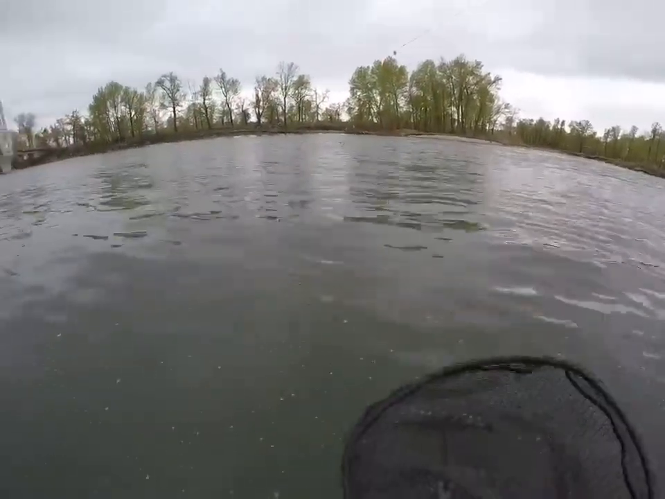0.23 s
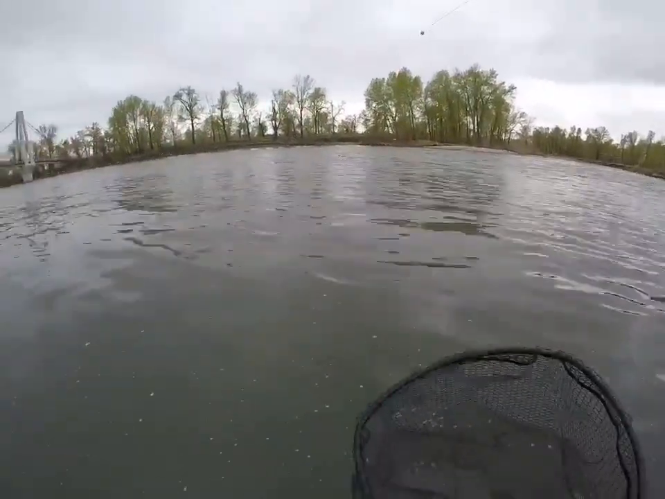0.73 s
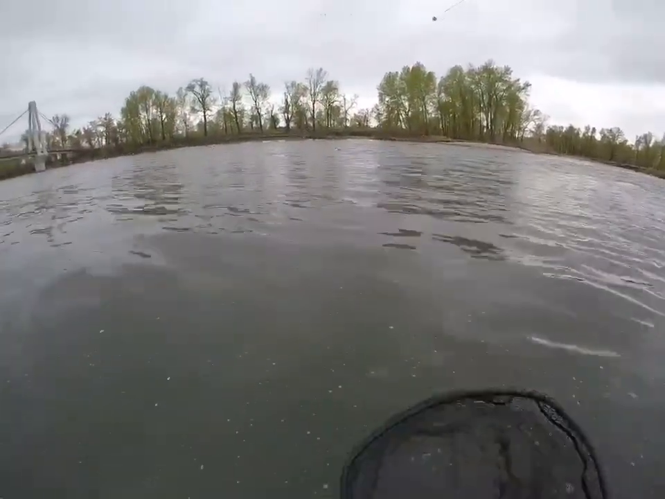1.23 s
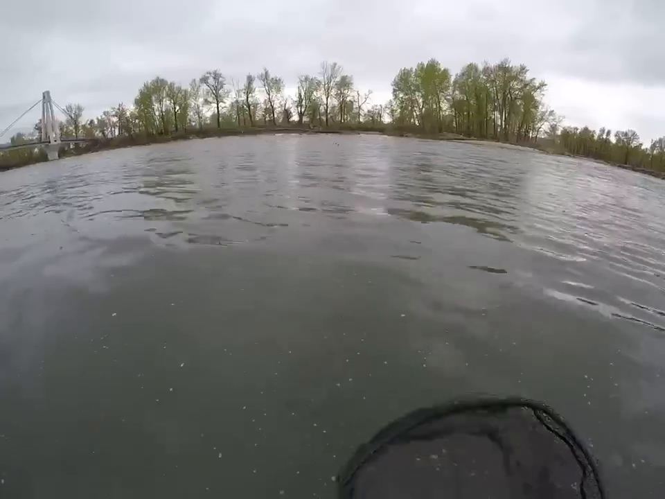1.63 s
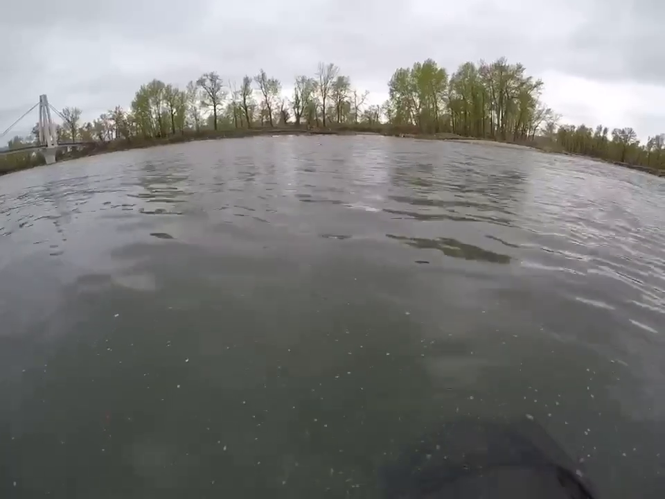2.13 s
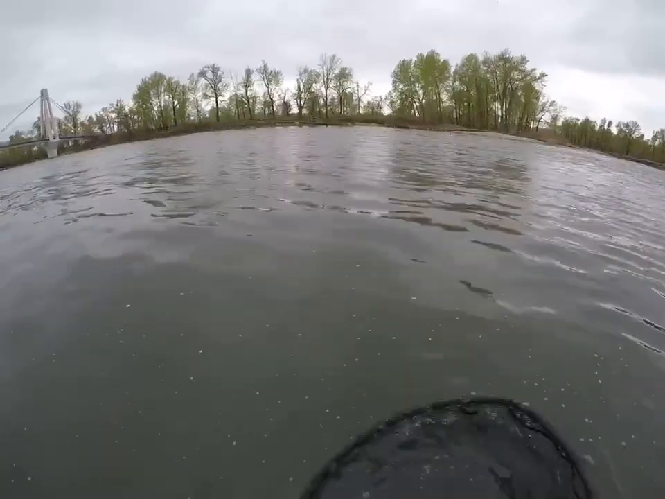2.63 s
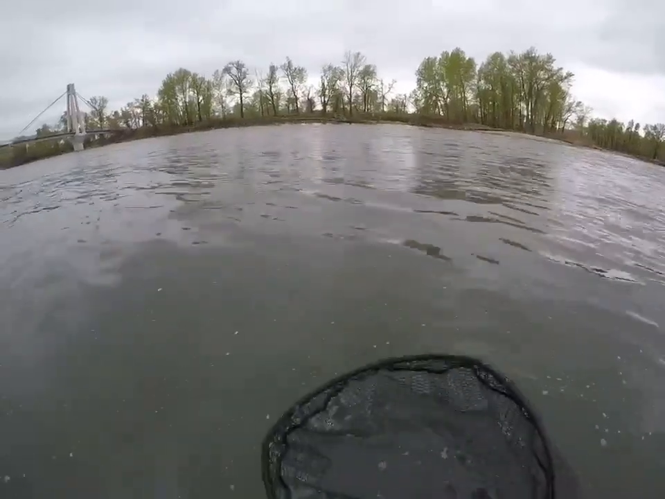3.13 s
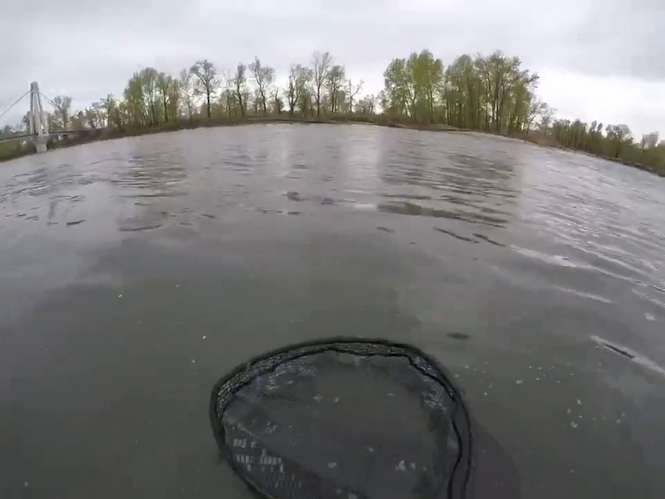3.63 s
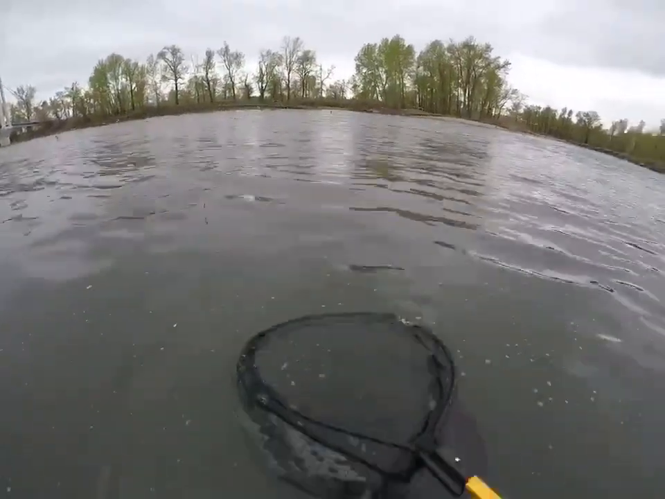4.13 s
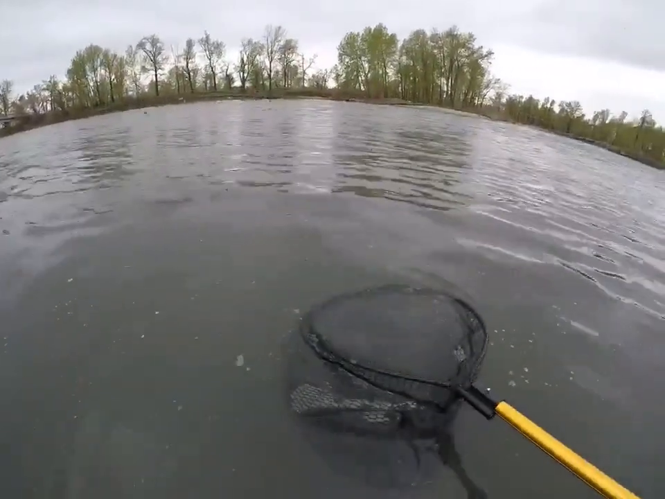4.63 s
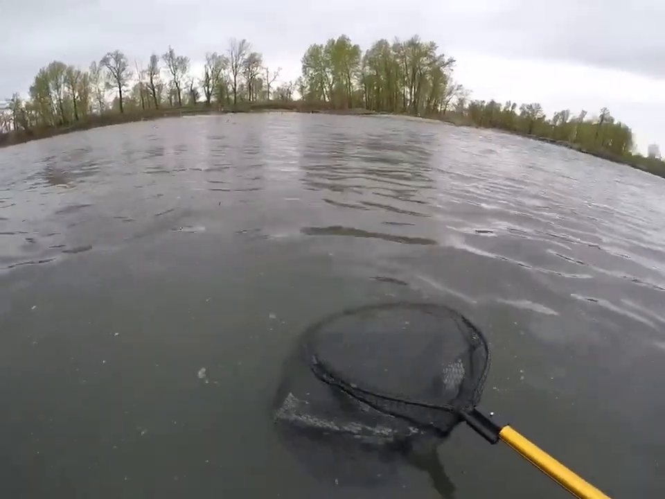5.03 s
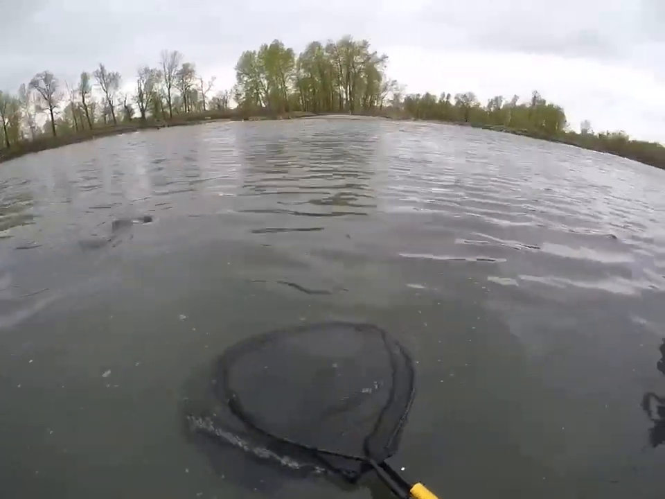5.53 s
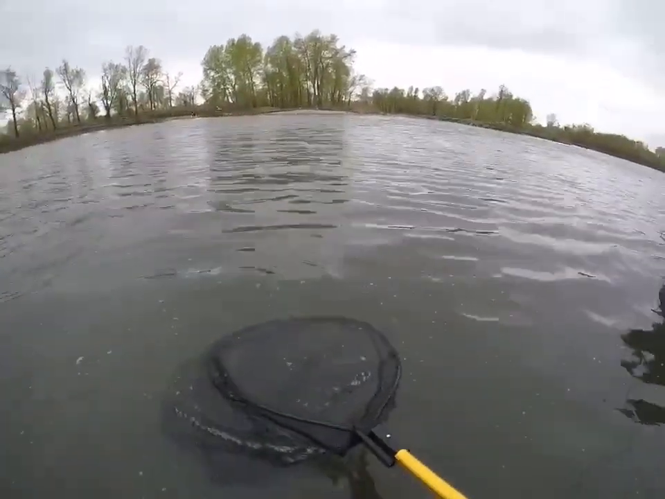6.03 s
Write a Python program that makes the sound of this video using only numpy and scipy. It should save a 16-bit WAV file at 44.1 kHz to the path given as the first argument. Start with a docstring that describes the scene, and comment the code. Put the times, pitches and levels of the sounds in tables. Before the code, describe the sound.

A crowded flock of squeaky gulls calls over a wide river; drips and ticks sound nearby, then a sharp clack and brief low rattle.

```python
"""Over the steady wash of a wide river, a small cased microphone first hears water running off its net and a drip.
Many gulls squeal close by throughout, overtone stacks on gliding pitches, with a fainter flock and echoes behind.
Ticks and drips, short dying tones, are scattered among them; from about 3.2 s the moved housing rumbles in noise.
A weak knock at 3.6 s and a hard cluster from 4.1 s ring the housing's modes and leave a low rattle."""
import sys
import numpy as np
from scipy import signal
from scipy.io import wavfile
from scipy.ndimage import uniform_filter1d

SR = 44100
rng = np.random.default_rng(int(sys.argv[2]) if len(sys.argv) > 2 else 0)


def invert_db(level):
    """Linear amplitude ratio for a level in decibels (20 dB per decade), elementwise."""
    return 10 ** (np.asarray(level, dtype=float) / 20)


def dump(signal):
    """Clip the signal to [-1, 1] and save it as 16-bit WAV at the path in sys.argv[1]."""
    limited = np.clip(np.atleast_2d(signal).T, -1, 1)
    pcm = np.round(limited * 32767).astype(np.int16)
    wavfile.write(sys.argv[1], SR, pcm)


N = 276948

REGISTER_HZ = 1450  # calls that start below this are in the low register


def evened(x):
    """Scales to rms 1."""
    return x / np.sqrt(np.mean(x ** 2) + 1e-20)


def read_spectrum(points, hz):
    """Reads (Hz, dB) points on a log-frequency axis."""
    point_hz, point_db = np.transpose(points)
    return np.interp(np.log(hz + 1), np.log(point_hz + 1), point_db)


def add(mix, start_s, sound):
    """Mixes a sound in at its start time."""
    part = mix[round(start_s * SR):][:len(sound)]
    part += sound[:len(part)]


def drift(rows, length, width):
    """Slow chance: normal random points every width samples, joined by straight lines, one row each."""
    width = max(int(width), 1)
    coarse = rng.standard_normal((rows, length // width + 2))
    position = np.arange(length) / width
    return np.array([np.interp(position, np.arange(len(points)), points) for points in coarse])


def band_filter(x, low_hz, high_hz):
    """Keeps the band between two frequencies with gentle slopes."""
    return signal.sosfilt(signal.butter(2, [low_hz, high_hz], "band", fs=SR, output="sos"), x)


def river():
    """Wash of the water: random short-time spectra with drifting patches; the bass comes in lumps."""
    # average spectrum of the wash, relative: frequency_hz, density_db (dB per Hz)
    wash = [(150, 2.5), (230, -8), (500, -10), (1500, -15), (3600, -20), (4800, -29.5), (6300, -30.5),
            (9000, -33.5), (15000, -48)]
    level_db, patchy_db, lumpy_db = -40.5, 1.1, 0.5
    frames, hz = N // 256 + 5, np.fft.rfftfreq(1024, 1 / SR)
    real, imaginary, patches = rng.standard_normal((3, len(hz), frames))
    patches = uniform_filter1d(patches, 12, axis=0)  # across frequency
    patches = evened(uniform_filter1d(patches, 14, axis=1))  # along time
    lumps = evened(uniform_filter1d(rng.standard_normal(frames), 10))
    spectrum_db = read_spectrum(wash, hz)[:, None] + patchy_db * patches
    spectrum_db += lumpy_db * np.exp(-hz / 400)[:, None] * lumps
    spectra = (real + 1j * imaginary) * invert_db(spectrum_db)
    sound = signal.istft(spectra, nperseg=1024, noverlap=768)[1][:N]
    return invert_db(level_db) * evened(sound)


def banks(x, t60):
    """Scattered echoes from water, trees and the far bank: random taps, dulled and dying over t60 seconds."""
    taps = np.zeros(SR)
    count = (SR - 301) // 20
    places = np.arange(300, SR - 20, 20) + rng.integers(0, 20, count)
    taps[places] = rng.choice([-1., 1.], count)
    decay = invert_db(-60 * np.arange(SR) / SR / t60)
    taps = signal.lfilter([1], [1, -.5], taps * decay)
    return signal.fftconvolve(x, taps / np.linalg.norm(taps))[:N]


def rustle():
    """Water running off the net: treble noise in fast random lumps fizzes like dense small drops."""
    # strength of the running water, silent afterwards: time_s, level_db
    running = [(0, -54), (.1, -48.5), (.18, -64), (.3, -89)]
    drops = rng.standard_normal(N) * invert_db(2.3 * drift(1, N, 160)[0])
    fizz = band_filter(drops, 2500, 7000)
    level_db = np.interp(np.arange(N) / SR, *np.transpose(running), right=-120)
    return invert_db(level_db) * evened(fizz)


def blip(hz, cycles, rise):
    """A short dying tone; rise is in cycles."""
    turns = np.arange(int(cycles * SR / hz)) * hz / SR
    shape = (1 - np.exp(-turns / rise)) * np.exp(-3.5 * turns / cycles)
    return shape / shape.max() * np.sin(2 * np.pi * turns)


def small_sounds():
    """Drips ring as bubbles; ticks are a sharp edge with a short high ring."""
    # drips near the microphone: start_s, peak_db, pitch_hz, length_cycles
    drips = [(.066, -30.5, 680, 10), (1.772, -31, 804, 7.4), (4.145, -27.5, 1700, 9)]
    # ticks near the microphone: start_s, peak_db, pitch_hz
    ticks = [(0.128, -36, 4320), (4.178, -33.5, 3870), (4.2807, -42, 5730), (4.362, -36, 5760),
             (5.508, -34, 4200), (5.8678, -31.5, 6060), (3.889, -58, 11500), (3.925, -52, 13000),
             (4.2, -42, 4500), (4.235, -42, 5700), (5.568, -34, 3500), (5.833, -40, 5500)]
    out = np.zeros(N)
    for start_s, peak_db, hz, cycles in drips:
        add(out, start_s, invert_db(peak_db) * blip(hz, cycles, rise=2.6))
    for start_s, peak_db, hz in ticks:
        add(out, start_s, invert_db(peak_db) * blip(hz, cycles=10, rise=.3))
    return out


def handling():
    """Low lumpy rumble as the housing is moved: bass noise with a wavering level."""
    # strength of the rumble over time: time_s, level_db
    thrum = [(3.2, -73), (3.55, -48.5), (3.9, -66), (4.25, -47), (4.6, -57), (5.0, -43), (5.6, -60),
             (6.2, -51)]
    bass = band_filter(rng.standard_normal(N), 60, 320) / np.sqrt(2 * 320 / SR)
    level_db = np.interp(np.arange(N) / SR, *np.transpose(thrum))
    return bass * invert_db(level_db + 2.9 * drift(1, N, 1800)[0])


def rattle():
    """Low rattle left by the loudest knock: dying lumpy noise."""
    t = np.arange(SR // 2) / SR
    lumps = rng.standard_normal(len(t)) * invert_db(1.8 * drift(1, len(t), 520)[0])
    return invert_db(-39 - 60 * t / 0.74) * evened(band_filter(lumps, 170, 650))


def knocks():
    """Each knock rings the modes of the housing, a hard one more in the treble and with a stronger crack."""
    # modes of the microphone housing: frequency_hz, relative level_db, t60_s
    housing = [(157, 10.5, 0.078), (403, 3.5, 0.009), (1300, -12, 0.0072), (4200, -36.5, 0.012)]
    # knocks on the housing: start_s, peak_db of the ring, hardness_db (dB per octave)
    hits = [(3.59, -30, -2), (4.105, -14, -1), (4.113, -7, 0), (4.116, -8.5, 3.5), (4.154, -35, -8),
            (4.221, -32, -11), (4.306, -31.5, -5)]
    out, t = np.zeros(N), np.arange(6000) / SR
    for start_s, peak_db, hard_db in hits:
        ring = np.zeros(len(t))
        for hz, mode_db, t60 in housing:
            decay = invert_db(mode_db + hard_db * np.log2(hz / 167) - 60 * t / t60)
            onset = 1 - np.exp(-t * hz / 1.3)
            ring += decay * onset * np.sin(2 * np.pi * hz * t)
        crack = uniform_filter1d(rng.standard_normal(len(t)), size=6)
        crack *= invert_db(-30 + 3.3 * hard_db - 60 * t / 0.007)
        add(out, start_s, invert_db(peak_db) * (crack - ring / abs(ring).max()))
    add(out, 4.12, rattle())
    return out


def gull(rows, voice_settings, shimmer_db):
    """A stack of overtones on a gliding pitch, coloured by the throat, with a little rasp."""
    # throat and microphone case together: frequency_hz, level_db
    throat = [(800, -13), (1500, -3.5), (2200, -6), (3200, -3), (4000, -11), (4600, -16.5), (5300, -17.5),
              (6200, -18), (7500, -28.5), (10800, -44), (12500, -50), (15000, -57)]
    attack_s, low_attack_s, stop_s = .004, .009, .0014  # low calls start softer; all stop short
    thin_db_per_octave = -3  # per overtone: the higher a call climbs, the more its upper overtones fade
    top_hz = 10800
    level_db, first_db, odd_db, bright_db, top_db = voice_settings
    s, hz = np.transpose(rows)
    edge_s = low_attack_s if hz[0] < REGISTER_HZ else attack_s
    t = np.arange(s[0] - edge_s / 2, s[-1] + stop_s, 1 / SR)
    hz = uniform_filter1d(np.interp(t, s, hz), 320, mode="nearest")  # rounds the bends of the pitch
    octaves = np.log2(hz / hz.mean())
    k = np.arange(1, 15)[:, None]  # overtone numbers, 1 is the fundamental
    overtone_hz = k * hz

    colour_db = read_spectrum(throat, overtone_hz) + first_db * (k == 1) + odd_db * (k % 2) * (k > 1)
    colour_db += top_db * (overtone_hz > top_hz) + thin_db_per_octave * (k - 1) * octaves
    colour_db += bright_db * np.log2(overtone_hz / 2500)
    height = invert_db(colour_db) * (overtone_hz < SR / 3)
    height /= np.sqrt((height ** 2).sum(0) / 2)
    # the bird turns and its mirror image in the water adds or cancels:
    # each overtone wavers alone, high ones most
    height *= invert_db(shimmer_db * np.sqrt(overtone_hz / 2000) * drift(len(k), len(t), 520))
    # uneven cycles spread a haze around each overtone
    haze = np.minimum(.035 * (overtone_hz / 2000) ** 2, .5)
    height *= 1 + haze * drift(len(k), len(t), 30)

    turns = np.cumsum(hz * (1 + .005 * drift(1, len(t), 350)[0])) / SR
    stack = (height * np.cos(2 * np.pi * (k * turns + rng.random(k.shape)))).sum(0)
    edge = np.clip(np.minimum((t - t[0]) / edge_s, (t[-1] - t) / stop_s), 0, 1)
    effort_db = level_db + 8 * octaves  # more effort raises pitch and level together
    return max(t[0], 0), invert_db(effort_db) * edge * stack


def far_flock(near, count):
    """Fainter birds at random moments: a quick rising squeal or a falling arch, louder while near ones call."""
    far_db = -18
    busy_db = 10 * np.log10(uniform_filter1d(near ** 2, 6000) + invert_db(-103))
    out = np.zeros(N)
    for when, length, pitch, bend, size, kind in rng.random((count, 6)):
        start_s, span_s = when * (N / SR - .1), .04 + .1 * length
        level_db = far_db + .8 * busy_db[int(start_s * SR)] - 6 * size
        squeal_hz, arch_hz = np.array([.87, 1.0, 1.2]) * 1120, np.array([.98, 1.05, .88]) * 1800
        hz = squeal_hz if kind < .5 else arch_hz
        hz = hz * (1 + .3 * (pitch - .5) + .15 * (bend - .5) * np.arange(3))
        rows = np.transpose([start_s + span_s * np.array([0, .5, 1]), hz])
        add(out, *gull(rows, (level_db, 0, 0, -2, 0), shimmer_db=2.5))
    return out


def voice(start_s, hz, level_db, first_db):
    """Level, fundamental, odd overtones, brightness and top overtones (dB) of a call starting on pitch hz."""
    # how bright the calls arrive: start_s, brightness_db (dB per octave), top_overtones_db
    treble = [(.2, -14, 0), (.6, 1.5, -33), (.85, 2, 5), (1.049, -1.5, 10.5), (1.4, 1, -10), (1.7, 5.5, -1),
              (1.9, -5.5, 14), (2.4, -4.5, -4), (2.85, 0, 6), (3.1, -1, 17.5), (3.35, 0.5, -22),
              (3.7, -0.5, 11), (4.4, -3, 8), (4.7, -3, -9), (5.001, 3, -8), (5.21, -0.5, -11),
              (5.5, 0.5, 5), (6.04, -3.5, -3), (6.1, 1.5, -10), (6.2, 4, -20)]
    times, arriving_db, top_db = np.transpose(treble)
    low = hz < REGISTER_HZ
    # a strong fundamental goes with strong treble and a thin middle
    bright_db = -0.59 + 0.3366 * first_db + np.interp(start_s, times, arriving_db)
    bright_db -= 1 * low  # the low register is duller, dB per octave
    odd_db = 4 if low else 1  # odd overtones against even ones
    return level_db, first_db, odd_db, bright_db, np.interp(start_s, times, top_db)


def near_birds():
    """Straight glides, single bends and calls drawn point by point, all from the same kind of throat."""
    # calls sliding straight up or down: start_s, length_s, from_hz, to_hz, level_db, fundamental_db
    glides = [ (0.158, 0.12, 1613, 1730, -47.5, 35), (0.733, 0.014, 1610, 1480, -35.5, 7),
              (0.799, 0.25, 2294, 2520, -47, 6), (0.673, 0.049, 1480, 1406, -36, -22),
              (0.877, 0.033, 1368, 1465, -39.5, 4), (1.157, 0.06, 2424, 2100, -42.5, -4),
              (4.517, 0.068, 1205, 1350, -43, -13), (4.592, 0.11, 1102, 1074, -40.5, -24),
              (0.615, 0.042, 1636, 1760, -36.5, 7), (0.806, 0.041, 2100, 1950, -38, 6),
              (1.5, 0.092, 1433, 1300, -41.5, 19), (1.141, 0.049, 1340, 1385, -36, -4),
              (1.191, 0.14, 1561, 1203, -44, -9), (1.447, 0.12, 1092, 1191, -37, 6),
              (1.489, 0.13, 1730, 1814, -46.5, -6), (1.585, 0.068, 2040, 1837, -35.5, 14),
              (2.332, 0.17, 1069, 1163, -53.5, -16), (2.45, 0.095, 743, 1150, -45, -12),
              (2.562, 0.036, 1860, 1570, -57, 12), (4.577, 0.029, 1592, 1263, -35, 10),
              (4.626, 0.024, 1304, 1560, -37, -11), (4.983, 0.06, 1800, 1300, -36, -7),
              (3.886, 0.019, 1870, 1300, -41, 24), (1.921, 0.051, 1036, 1052, -42.5, -14),
              (0, 0.11, 2010, 1830, -48.5, -20), (0.099, 0.14, 1193, 1298, -55.5, -15),
              (0.788, 0.16, 1004, 1132, -43, 5), (4.592, 0.039, 1043, 1130, -35, -12),
              (4.87, 0.15, 1105, 1210, -39.5, 3), (4.94, 0.014, 1100, 1215, -35, -12),
              (4.994, 0.12, 1330, 1215, -50, 12), (5.181, 0.041, 2010, 1910, -35, 22),
              (6.1, 0.066, 985, 1294, -36, 3), (6.141, 0.055, 988, 1322, -37.5, 18), ]
    # calls on a parabola of pitch:
    # start_s, length_s, from_hz, middle_hz, to_hz, level_db, fundamental_db
    bends = [ (0.291, 0.058, 860, 992, 1300, -48.5, -16), (2.045, 0.1, 1978, 2046, 1755, -40, -1),
             (3.294, 0.089, 860, 1122, 1327, -33.5, -7), (0.424, 0.18, 983, 1157, 1282, -47.5, -1),
             (0.551, 0.072, 953, 1187, 1338, -38.5, 0), (0.779, 0.08, 1852, 1640, 1517, -31.5, 13),
             (0.86, 0.1, 1930, 2093, 2100, -41, 1), (0.851, 0.12, 1720, 1802, 1853, -41, -6),
             (0.984, 0.17, 1064, 1201, 1272, -35, -9), (1.048, 0.082, 1290, 1312, 1325, -36.5, -13),
             (1.153, 0.05, 1140, 1076, 983, -39, 4), (1.351, 0.085, 948, 1095, 1322, -35, -6),
             (1.434, 0.17, 1720, 1810, 1672, -36, 8.5), (1.711, 0.054, 1770, 1736, 1410, -37, 19),
             (3.533, 0.093, 990, 1298, 1510, -35.5, -7), (1.646, 0.065, 1050, 1164, 1366, -38.5, 21),
             (4.809, 0.16, 1780, 1576, 1540, -38.5, 10), (4.741, 0.043, 1050, 1393, 1524, -26.5, -10),
             (4.994, 0.071, 1817, 2240, 2060, -43.5, -7), (2.185, 0.096, 1420, 1513, 1424, -46.5, -25),
             (2.542, 0.099, 1225, 1289, 1104, -42, 2), (2.771, 0.17, 1657, 1627, 1550, -41.5, 17),
             (3.106, 0.097, 1035, 988, 1043, -34.5, -54), (3.107, 0.082, 1057, 1255, 1414, -39, 2),
             (3.379, 0.19, 1755, 1844, 1670, -36.5, 9), (5.408, 0.056, 1010, 910, 674, -42.5, -3),
             (2.958, 0.096, 1350, 1158, 865, -43, -21), (2.495, 0.072, 1497, 1850, 1550, -49, 6),
             (3.895, 0.15, 1165, 1309, 1157, -45.5, -1), (4.48, 0.097, 1450, 1639, 1300, -31, 8),
             (4.508, 0.063, 2170, 1990, 1780, -35, 8), (4.596, 0.12, 1776, 1640, 1310, -37.5, 8),
             (4.642, 0.097, 1880, 2080, 2140, -37, 7), (4.683, 0.056, 1097, 1024, 1190, -40, 0),
             (4.784, 0.1, 1040, 954, 1054, -36.5, -22), (5.054, 0.12, 1086, 1203, 1427, -38.5, -6.5),
             (5.145, 0.058, 950, 1060, 1214, -36, -3), (5.659, 0.085, 962, 989, 868, -41.5, -14),
             (6.22, 0.055, 1456, 1537, 1750, -35.5, 11), ]
    # calls with their pitch drawn point by point: level_db, fundamental_db, rows of (time_s, pitch_hz)
    drawn_calls = [ (-44, -4, [(.35, 1714), (.375, 1928), (.5, 1863), (.537, 1640)]),
                   (-32.5, -7.5, [(.595, 827), (.607, 1061), (.628, 1126), (.672, 1012), (.743, 1228),
                   (.783, 1490)]), (-31.5, -3.5, [(1.042, 1973), (1.075, 2095), (1.1, 2065), (1.125, 1910),
                   (1.153, 1740)]), (-30.5, -7.5, [(.958, 957), (.995, 1112), (1.022, 1276), (1.036, 1480),
                   (1.045, 1510)]), (-31, -10, [(1.755, 1004), (1.778, 1210), (1.8, 1300), (1.812, 1560),
                   (1.826, 1580)]), (-32.5, -9, [(3.058, 1020), (3.073, 1256), (3.092, 1584),
                   (3.103, 1625)]), (-37, 1, [(3.193, 1854), (3.225, 1970), (3.255, 2010), (3.29, 1927),
                   (3.34, 1777), (3.39, 1630), (3.452, 1440)]), (-34.5, -8, [(3.665, 976), (3.69, 1124),
                   (3.715, 1202), (3.729, 1318), (3.74, 1540)]), (-37, -18, [(4.415, 1196), (4.447, 1134),
                   (4.462, 1240), (4.474, 1410)]), (-44, -13, [(5.22, 1274), (5.238, 1126), (5.27, 1082),
                   (5.292, 940), (5.318, 744)]), (-35, -10, [(1.821, 1091), (1.855, 1032), (1.89, 1144),
                   (1.92, 1412)]), (-39.5, -18, [(1.96, 1058), (2.015, 1142), (2.03, 1446), (2.05, 1110)]),
                   (-39, -23, [(1.82, 2180), (1.858, 2223), (1.909, 1840), (1.935, 1650)]),
                   (-40, -12, [(1.908, 1782), (1.938, 2120), (1.965, 2240), (2.002, 1965), (2.03, 1958),
                   (2.047, 1704), (2.105, 1414)]), (-49.5, -1, [(2.21, 1100), (2.31, 1119), (2.36, 1237),
                   (2.415, 1343), (2.445, 1125)]), (-50.5, -20, [(2.19, 804), (2.27, 868), (2.292, 955),
                   (2.335, 1044), (2.367, 935)]), (-43.5, -4, [(2.65, 1108), (2.678, 1300), (2.73, 1333),
                   (2.76, 1310), (2.775, 1420)]), (-38, -10, [(2.804, 974), (2.844, 1165), (2.912, 1285),
                   (2.95, 1470)]), (-37.5, -25, [(3.101, 2080), (3.145, 1935), (3.175, 2054), (3.192, 2172),
                   (3.225, 2140), (3.255, 1890), (3.28, 1740), (3.305, 1510)]), (-36.5, -12, [(3.632, 1963),
                   (3.676, 2040), (3.725, 2155), (3.762, 1770), (3.785, 1720)]), (-35.5, -11, [(3.7, 812),
                   (3.73, 960), (3.78, 1107), (3.8, 1160), (3.823, 1407), (3.853, 1320), (3.868, 1105)]),
                   (-35, 11, [(3.742, 2057), (3.765, 2125), (3.802, 2070), (3.83, 1748), (3.884, 1700)]),
                   (-35.5, 2.5, [(4.312, 765), (4.322, 860), (4.336, 955), (4.382, 949), (4.495, 1117),
                   (4.514, 1330)]), (-32, 1.5, [(4.782, 2050), (4.84, 1892), (4.895, 2113), (4.921, 2130),
                   (4.963, 1893), (4.992, 1860)]), (-40.5, 4, [(5.21, 1755), (5.27, 1822), (5.335, 1874),
                   (5.365, 1760), (5.405, 1620)]), (-40.5, -1.5, [(5.572, 848), (5.59, 1110), (5.64, 1240),
                   (5.668, 1490)]), (-41, 7, [(6.042, 905), (6.069, 973), (6.15, 1000), (6.216, 1100),
                   (6.236, 1250)]), (-39, 5.5, [(6.184, 1950), (6.202, 1860), (6.238, 2030),
                   (6.268, 1813)]), ]
    calls = []
    for start_s, span_s, from_hz, to_hz, level_db, first_db in glides:
        calls.append((level_db, first_db, [(start_s, from_hz), (start_s + span_s, to_hz)]))
    u = np.linspace(0, 1, num=9)  # position within the call
    for start_s, span_s, from_hz, middle_hz, to_hz, level_db, first_db in bends:
        bow_hz = middle_hz - (from_hz + to_hz) / 2
        hz = from_hz + (to_hz - from_hz) * u + bow_hz * (1 - (2 * u - 1) ** 2)
        calls.append((level_db, first_db, np.transpose([start_s + span_s * u, hz])))
    out = np.zeros(N)
    for level_db, first_db, rows in calls + drawn_calls:
        settings = voice(*rows[0], level_db, first_db)
        add(out, *gull(rows, settings, shimmer_db=3.2))
    return out


def scene():
    """Near birds, far birds, their echoes, the river and the small close sounds."""
    near = near_birds()
    birds = near + far_flock(near, count=150)
    echoes = invert_db(-14.5) * banks(birds, t60=.4)
    close = rustle() + small_sounds() + handling() + knocks()
    return (river() + echoes + close + birds)[None]


def top_cut(x):
    """Nothing passes above the cut-off."""
    return signal.sosfilt(signal.butter(12, 15160, fs=SR, output="sos"), x)


def record(dry):
    """The microphone's steep wind filter, then the faint rumble of the amplifier."""
    wind_filter = signal.cheby2(7, 45, 108, "high", fs=SR, output="sos")
    cut = signal.sosfilt(wind_filter, dry)
    rumble = signal.lfilter([1], [1, -.98], rng.standard_normal(dry.shape))
    mix = cut + invert_db(-71) * evened(rumble)
    return top_cut(mix)


dry = scene()
out = record(dry)
dump(out)
```